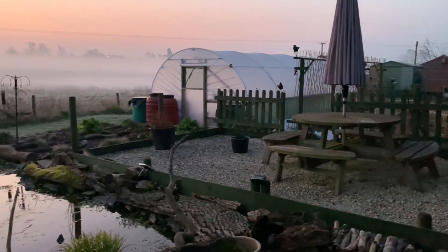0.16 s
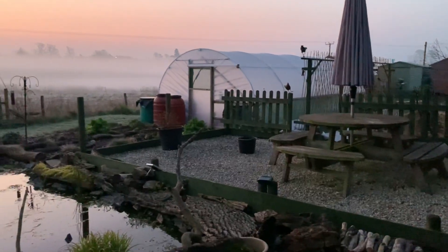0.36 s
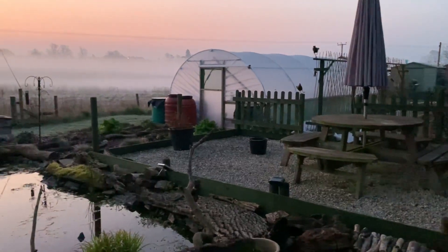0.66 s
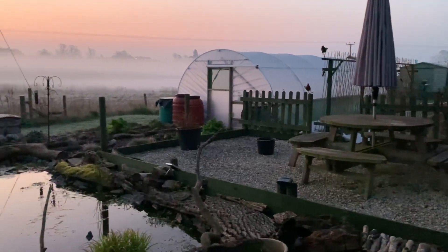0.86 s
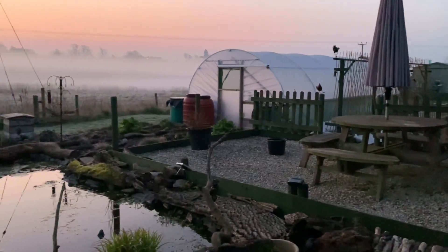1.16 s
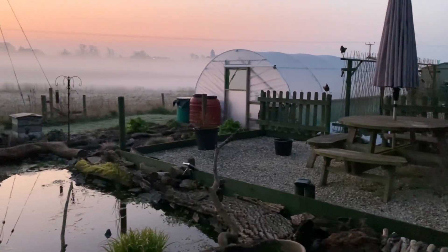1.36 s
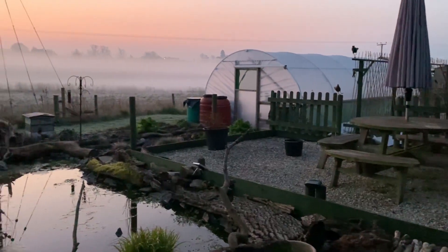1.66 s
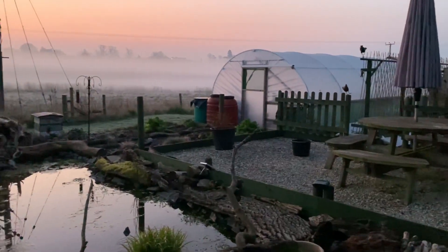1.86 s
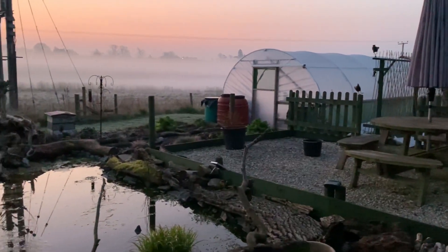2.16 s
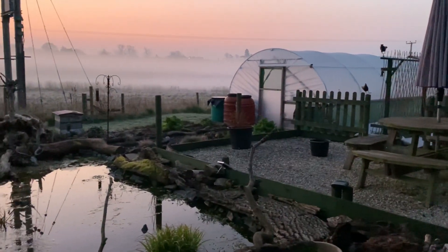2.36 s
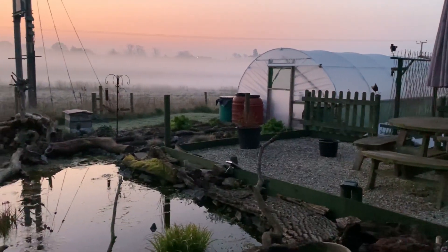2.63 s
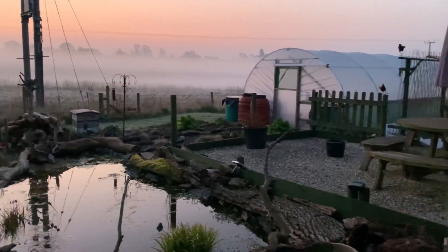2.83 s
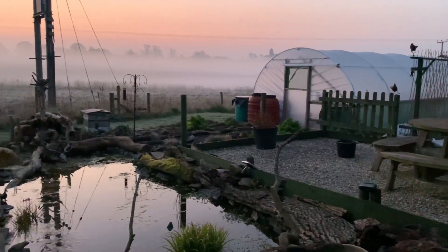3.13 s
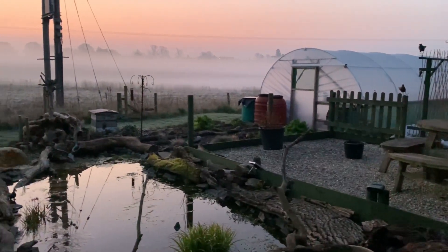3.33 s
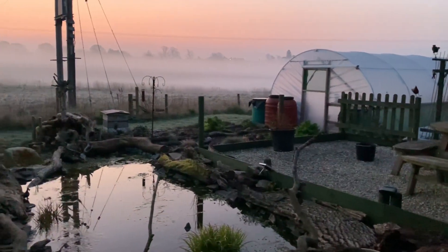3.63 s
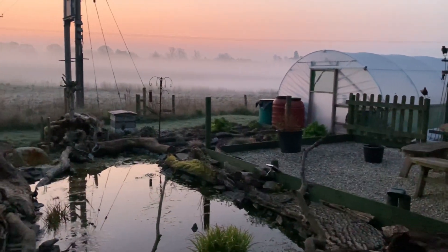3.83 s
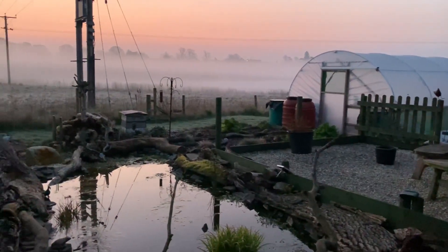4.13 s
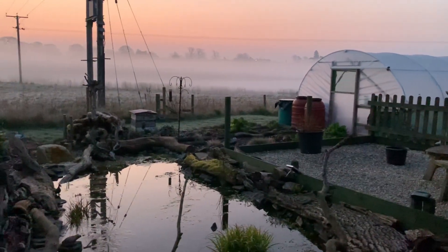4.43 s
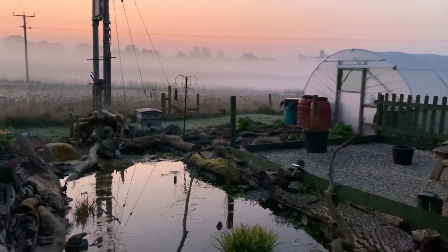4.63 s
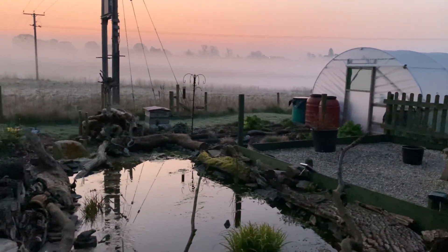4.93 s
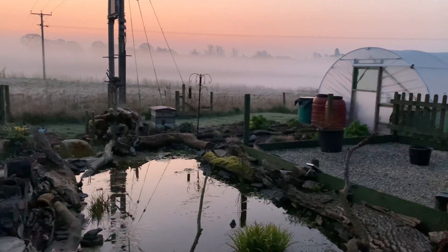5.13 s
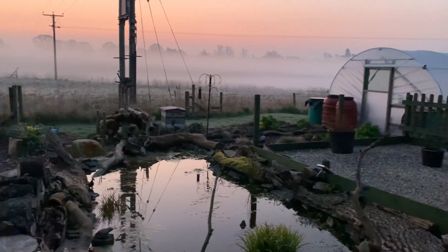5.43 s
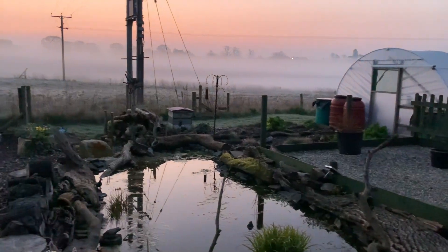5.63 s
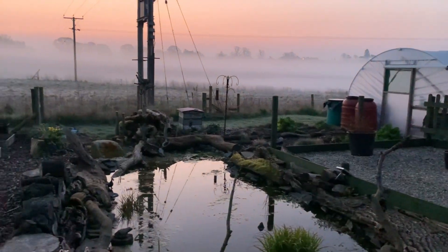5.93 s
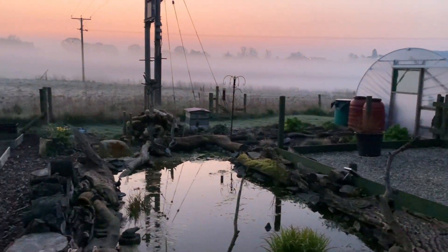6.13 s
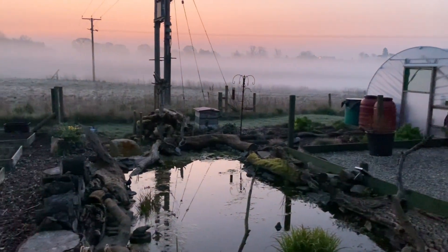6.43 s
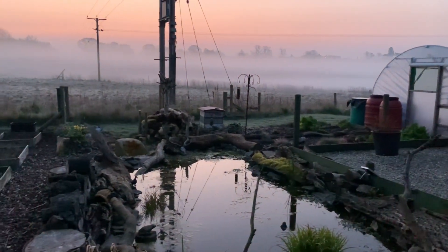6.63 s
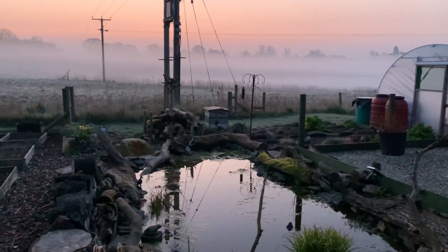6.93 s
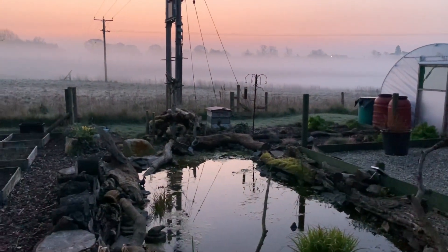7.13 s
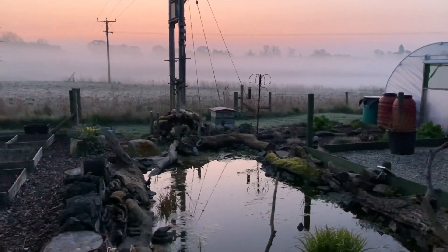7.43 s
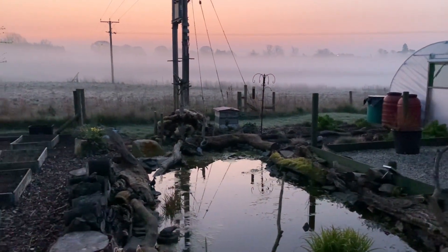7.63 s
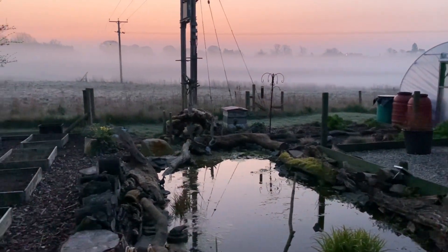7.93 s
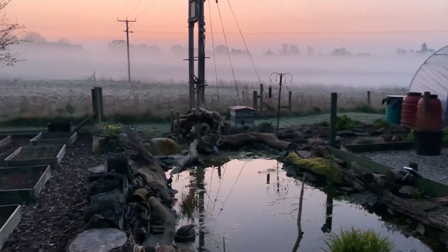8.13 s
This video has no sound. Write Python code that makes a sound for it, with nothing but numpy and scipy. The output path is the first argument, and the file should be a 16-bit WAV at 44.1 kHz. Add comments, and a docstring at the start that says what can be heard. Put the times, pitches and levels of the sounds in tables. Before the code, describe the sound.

Dawn birdsong outdoors: faint chirps and a pheasant's crow, then a rapid near warble, an answering trill, soft cockerels and clucks above low road rumble.

```python
"""A close songbird warbles in a country garden at dawn, heard by a hand-held two-port microphone. A second one answers
with whistles and a falling trill; fainter birds sing behind: all are gliding, nearly pure tones with weak overtones.
A pheasant, guinea fowl and a cockerel call from the left, a lower cockerel from the right: stacks of overtones shaped
by a throat, with hoarse breath for the pheasant. Sheds and hedges echo the birds. Filtered noise makes a far road
rumble and a blur of distant birds, and short resonances make the ticks of the hand on the housing."""
import sys
import numpy as np
from scipy import signal
from scipy.fft import rfft, irfft, next_fast_len
from scipy.io import wavfile
from scipy.ndimage import uniform_filter1d

SR = 44100
rng = np.random.default_rng(int(sys.argv[2]) if len(sys.argv) > 2 else 0)


def int16_out(signal):
    """Quantize to a 16-bit WAV file."""
    q = np.round(np.clip(np.atleast_2d(signal).T, -1, 1) * 32767)
    wavfile.write(sys.argv[1], SR, q.astype(np.int16))


N = 365588

# The colour of the road rumble. Each row: pitch in Hz, relative level in dB per Hz.
RUMBLE_COLOUR = [(15, -52.5), (25, -9.5), (71, 0.5), (140, -13.5), (227, -12.5), (331, -11), (1270, -30.5),
                 (2360, -41.5), (3170, -60), (4260, -47.5), (6730, -52), (10100, -50.5), (11800, -65.5),
                 (13500, -42.5), (15500, -77)]
# How alike the rumble is at the two ports. Each row: pitch in Hz, likeness from 0 to 1.
PORT_LIKENESS = [(60, .94), (130, .9), (290, .75), (640, .5), (1400, .1), (15000, 0)]
# The rise and fall of the many distant birds. Each row: time in seconds, relative level in dB.
CHORUS_LEVEL = [(0.0, -72.5), (1.48, -80), (2.119, -70), (2.28, -60), (3.02, -81), (3.55, -79),
                (4.5, -65.5), (6.189, -77.5), (6.53, -68), (7.3, -80.5), (7.57, -81.5), (8.29, -82)]
# The colour of their blur. Each row: pitch in Hz, relative level in dB per Hz.
CHORUS_COLOUR = [(1200, -5), (1800, -16), (2500, 12), (3500, 1), (5000, -4.5), (7000, -17), (9000, -33.5)]

# Strokes, the single sweeps of a voice, of the birds behind. Each row: start in seconds, length in seconds, first pitch
# in Hz, turning pitch in Hz, last pitch in Hz, turn as a share of the length, loudest point as a share of the length,
# peak level in dB, lag of the left port in milliseconds.
FAR_BIRD_STROKES = [(0, 0.19, 2293, 2540, 2570, 0.61, 0.043, -68.5, -.47),
                    (.03, .1, 4660, 4490, 4410, 0.51, .2, -77.5, 0),
                    (.4, .2, 3060, 2920, 2790, 0.42, .3, -83, 0),
                    (.2, 0.19, 1970, 2070, 1984, 0.35, 0.4, -76.5, .15),
                    (.31, 0.13, 3500, 3546, 3440, 0.28, 0.14, -73, -.028),
                    (.32, 0.34, 4010, 3720, 3700, 0.34, 0.32, -78.5, 0),
                    (.42, 0.14, 5830, 5770, 5370, 0.48, .6, -75, .4),
                    (.6, 0.23, 2290, 2320, 2450, 0.41, 0.17, -67.5, -.47),
                    (.87, 0.078, 1940, 1890, 1930, 0.52, .1, -72, .14),
                    (1.305, 0.012, 7440, 6960, 6270, 0.56, 0.089, -67, -.323),
                    (1.378, 0.14, 6100, 6770, 6400, .15, 0.9, -70.5, 0),
                    (1.558, 0.15, 6100, 6550, 6300, 0.15, 0.46, -68, 0),
                    (1.8, 0.044, 2470, 2530, 2430, 0.43, .9, -69, 0),
                    (1.86, 0.043, 5560, 5300, 4800, 0.67, 0.39, -66, 0),
                    (1.965, 0.028, 3730, 3040, 3000, 0.45, 0.24, -57.5, .23),
                    (1.967, 0.017, 4200, 4130, 4050, 0.52, .85, -53.5, .23),
                    (1.99, 0.018, 4200, 4050, 3980, 0.39, 1, -50.5, .23),
                    (2.032, 0.0068, 4260, 3960, 3840, .49, 1, -38, .23),
                    (2.058, 0.023, 3840, 3680, 3270, .55, .3, -37, .25),
                    (2.108, 0.017, 3920, 4010, 4040, 0.42, 0.65, -41, .23),
                    (2.11, .047, 6030, 7640, 6000, 0.29, .2, -59, -.48),
                    (2.125, 0.03, 2960, 2870, 2880, 0.37, .45, -51, 0),
                    (2.168, 0.022, 3420, 3570, 2500, 0.54, 0.42, -38.5, .23),
                    (2.22, 0.028, 3920, 3790, 3700, 0.55, .2, -46.5, .23),
                    (2.235, .02, 2960, 2790, 2770, .49, .55, -54, -.042),
                    (2.279, 0.028, 3440, 3340, 2400, 0.45, 0.33, -42, .23),
                    (2.32, .18, 2880, 2660, 3170, 0.27, 1, -60, 0),
                    (2.325, 0.028, 3696, 3680, 3580, 0.4, .1, -46.5, .23),
                    (2.38, 0.11, 3800, 3675, 3640, 0.43, 0.46, -49, .23),
                    (2.395, 0.017, 8700, 8000, 7760, 0.32, .9, -52.5, -.09),
                    (1.01, .06, 3550, 3620, 3630, .49, .55, -75, 0.025),
                    (2.577, .008, 6000, 6550, 7150, 0.55, .55, -49, -0.115),
                    (2.575, 0.031, 5420, 5700, 5280, 0.51, .1, -58.5, 0),
                    (2.645, 0.047, 6100, 5630, 5390, .63, .95, -53.5, -.28),
                    (2.69, 0.08, 5330, 5100, 5200, 0.36, 0.7, -64.5, 0),
                    (2.915, 0.028, 6300, 5500, 4740, 0.56, .6, -58.5, .18),
                    (2.94, 0.095, 7040, 6890, 6940, 0.43, 0.42, -50.5, .16),
                    (2.96, 0.058, 7840, 7520, 7300, 0.24, 0.95, -45.5, .055),
                    (3.025, 0.045, 6110, 5660, 4560, 0.54, 0.98, -46, -.9),
                    (3.11, 0.1, 6950, 7020, 7220, 0.36, 0.51, -54, -.14),
                    (3.08, .13, 7860, 7640, 7600, .6, 0.96, -48, -0.064),
                    (3.155, 0.055, 5900, 4900, 3900, 0.24, .1, -57, -.92),
                    (3.27, 0.032, 5250, 4840, 4270, .49, .1, -51, -.09),
                    (3.25, 0.11, 7600, 7850, 7640, .45, .7, -50, -0.069),
                    (3.38, 0.089, 7750, 7900, 7530, 0.43, .45, -70, -.09),
                    (3.6, 0.019, 6650, 6400, 6260, .49, 0.28, -67, 0),
                    (3.76, 0.056, 7700, 7900, 7800, 0.49, .05, -73.5, -.09),
                    (3.86, 0.12, 7700, 7760, 7800, 0.32, .85, -62.5, .16),
                    (3.93, 0.051, 2920, 2550, 2500, 0.6, 0.24, -61, -.44),
                    (4.05, 0.15, 7680, 8170, 7690, 0.39, 0.39, -59, -.11),
                    (4.26, 0.078, 8240, 8060, 7950, 0.46, .3, -70.5, -.11),
                    (4.43, .14, 2165, 1855, 2070, 0.46, 0.11, -68, -.082),
                    (4.53, 0.051, 6470, 6100, 6000, 0.56, .85, -59, 0),
                    (4.59, 0.25, 1890, 2137, 2260, 0.38, 0.42, -61, .16),
                    (5.005, 0.18, 2050, 1770, 1620, 0.51, 0.3, -68, -.43),
                    (5.03, 0.16, 3110, 2920, 2760, .49, .1, -72.5, 0),
                    (5.05, 0.044, 6400, 5830, 7100, 0.33, 0.79, -60, -1.3),
                    (5.14, 0.056, 4290, 4140, 4036, .2, 0.4, -52, -.42),
                    (5.25, 0.035, 5800, 5460, 4580, 0.66, 1, -46.5, -.47),
                    (5.25, .2, 1890, 2175, 2300, 0.4, 0.25, -69.5, .05),
                    (5.35, 0.019, 4120, 4000, 3670, 0.44, 0.96, -57, -.42),
                    (5.45, 0.11, 2200, 2120, 1990, 0.56, 0.95, -74.5, 0),
                    (5.6, 0.14, 3180, 2970, 2730, 0.38, 0.98, -70.5, 0),
                    (5.7, 0.26, 2150, 2020, 1820, 0.48, 0.11, -78.5, -.56),
                    (6.05, 0.042, 3880, 3820, 3800, 0.69, 0.09, -71, 0),
                    (7.05, 0.35, 8170, 8150, 7900, 0.55, 0.24, -79, .14)]
# Weak overtones of all whistles. Each row: overtone pitch in Hz, dB against the whistle before the singer's own offset.
WHISTLE_OVERTONES = [(7000, -30), (8500, -25), (10500, -44.5), (11800, -49), (13500, -29.5), (15000, -47)]

# Ticks of the hand on the housing. Each row: time in seconds, then the relative strength in dB of the blow
# on the low, the middle and the high resonance.
TICKS = [(.3031, -54, -46.5, -57), (.326, -60, -62, -58), (4.0133, -27, -48, -36.5), (7.042, -37, -54, -51),
         (7.213, -34, -44, -50), (7.369, -34, -52, -61)]
# Resonances of the housing. Each row: pitch in Hz, width in Hz.
HOUSING_RESONANCES = [(420, 310), (3400, 710), (8500, 600)]

# Voices in the pheasant's crows, two at once in the first. Each row: the columns of the far birds without the lag.
CROW_STROKES = [(1.09, 0.18, 744, 752, 752, 0.25, 0.22, -55),
                (1.09, .2, 354, 342.6, 353, 0.48, 0.32, -55.5),
                (1.523, 0.11, 941, 944, 950, 0.25, 0.07, -52)]
# Its throat. Each row: pitch in Hz, relative level in dB.
CROW_THROAT = [(400, -34), (740, 6), (1050, 7.5), (1450, -15), (2000, -7), (2800, -29), (3300, 4),
               (3700, 6), (4500, -12), (5200, -22), (5600, -54)]
# Breath of the crows. Each row: start in seconds, length in seconds, loudest point as a share of the length, peak in dB.
CROW_BREATHS = [(1.09, 0.2, 0.37, -54), (1.521, 0.19, 0.073, -57)]
# The colour of that breath. Each row: pitch in Hz, relative level in dB per Hz.
BREATH_COLOUR = [(350, -46), (600, -24), (724, -1.5), (1070, 1), (1520, -18.5), (3760, -3.5), (4990, -12.5),
                 (5420, -22), (6030, -28), (10000, -30.5), (13000, -85), (22000, -120)]

# Guinea fowl squeals. Each row: the columns of the far birds without the lag.
SQUEAL_STROKES = [(1.825, .14, 902, 975, 993, 0.295, 0.91, -60),
                  (2.075, .425, 1176, 1253, 1155, 0.162, 0.21, -54.5)]
# The squealing throat. Each row: pitch in Hz, relative level in dB.
SQUEAL_THROAT = [(900, -5.5), (2400, -1.5), (3600, -11.5), (4900, 1.5), (6100, -5.5), (7400, -11),
                 (8500, -10.5), (10000, -12), (12000, -52)]

# Buzzing twitter. Each row: the columns of the far birds without the lag; the note leaps around these pitches.
TWITTER_STROKES = [(2.6, .12, 7220, 7280, 7220, .4, .55, -46),
                   (2.757, .108, 6800, 7400, 7300, .2, .55, -47)]

# The close singer. Each row: the columns of the far birds without the lag, peaks before its range is applied.
WARBLER_STROKES = [(2.797, 0.045, 5630, 6200, 4700, 0.3, 0.27, -56),
                   (2.799, 0.033, 4520, 4100, 2960, 0.37, 0.045, -38.5),
                   (2.937, 0.016, 4680, 4055, 3770, .66, .5, -38),
                   (2.952, 0.05, 3604, 4700, 4150, 0.35, 0.27, -33),
                   (3.058, 0.04, 4770, 5650, 6770, 0.36, 0.48, -36.5),
                   (3.097, 0.044, 6100, 5716, 5834, 0.42, 0.49, -28.5),
                   (3.199, 0.016, 6000, 5980, 6140, .45, .3, -31.5),
                   (3.213, .02, 4290, 5410, 5320, 0.41, 0.84, -29),
                   (3.231, 0.0077, 5540, 4830, 3640, .49, .3, -33),
                   (3.236, 0.017, 5540, 4570, 3750, 0.57, 0.18, -33.5),
                   (3.249, 0.018, 3470, 3525, 3320, .45, 0.076, -34.5),
                   (3.369, 0.0076, 4590, 5650, 6770, 0.67, 0.94, -32),
                   (3.379, 0.028, 5300, 4850, 4500, 0.45, .2, -47),
                   (3.38, 0.03, 5270, 5700, 5510, .7, 1, -28),
                   (3.398, 0.019, 3620, 4400, 5050, .49, 0.68, -41),
                   (3.41, 0.035, 5440, 5100, 3360, .57, 0.37, -31),
                   (3.417, 0.086, 3650, 3823, 3806, 0.29, 0.86, -26.5),
                   (3.46, .011, 3680, 4420, 4970, 0.43, 0.13, -34),
                   (3.474, 0.021, 5180, 4350, 4740, 0.66, .6, -33.5),
                   (3.554, 0.11, 2940, 3430, 3547, 0.11, 0.38, -32.5),
                   (3.564, 0.016, 4330, 5280, 4570, 0.35, 0.94, -48.5),
                   (3.674, 0.018, 6290, 5220, 3680, 0.87, .55, -30),
                   (3.69, 0.029, 3670, 6170, 3380, 0.36, 0.36, -29),
                   (3.71, 0.071, 3580, 3950, 3813, 0.22, 0.1, -29.5),
                   (3.758, 0.07, 4120, 5192, 5330, 0.27, .55, -30),
                   (3.8, 0.2, 3853, 3804, 4010, 0.39, 0.66, -43),
                   (3.822, 0.16, 4500, 4410, 4510, 0.39, 0.27, -49.5),
                   (3.885, 0.03, 3570, 3425, 3110, 0.52, 0.54, -37.5),
                   (3.894, 0.03, 3200, 4330, 3230, 0.36, 0.75, -38.5),
                   (4.032, 0.008, 4630, 5100, 5420, 0.86, 0.64, -28.5),
                   (4.042, 0.021, 5025, 4940, 3700, 0.45, 0.15, -30),
                   (4.105, 0.0075, 4720, 5230, 5270, 0.65, 0.92, -28),
                   (4.11, 0.023, 5010, 4830, 3540, 0.81, 0.19, -29),
                   (4.178, 0.018, 4600, 6930, 5560, 0.94, 0.054, -33.5),
                   (4.198, 0.036, 5500, 5470, 5900, 0.51, 0.82, -30.5),
                   (4.238, .02, 5450, 5130, 4620, 0.4, 0.6, -29.5),
                   (4.325, 0.025, 4890, 6600, 5800, 0.72, 0.58, -34.5),
                   (4.349, 0.04, 6000, 5776, 5625, 0.14, 0.83, -27.5),
                   (4.393, 0.022, 5940, 4956, 5760, 0.21, .3, -33),
                   (4.474, 0.019, 3550, 3410, 3140, 0.55, .4, -44.5),
                   (4.49, 0.094, 4700, 3880, 4130, 0.39, 0.084, -53),
                   (4.574, 0.052, 2350, 3770, 4440, 0.34, 0.96, -35),
                   (4.666, 0.017, 5620, 4900, 4390, 0.22, 0.71, -35),
                   (4.682, .067, 5130, 3970, 3260, 0.49, .1, -35),
                   (4.829, 0.025, 4000, 5650, 5230, 0.37, 0.26, -39),
                   (4.836, 0.11, 4930, 3806, 4330, 0.17, 0.39, -34),
                   (4.934, 0.043, 4230, 4790, 4325, 0.23, 0.3, -35)]
# How strongly it sounds across its range. Each row: pitch in Hz, relative level in dB.
WARBLER_RANGE = [(2500, -0.5), (4000, -3.5), (5800, -0.5), (6700, -1)]
# Where it sits. One row: lag of the left port in milliseconds, left minus right in dB per kHz of pitch,
# pitch in Hz at which the ports are level.
WARBLER_PLACE = (.19, 2.0, 4400)

# The answering singer. Each row: the columns of the far birds without the lag, peaks before its range is applied.
WHISTLER_STROKES = [(5.412, 0.07, 7610, 5730, 6250, 0.63, 0.1, -45),
                    (5.52, 0.043, 4020, 4420, 5100, 0.22, 0.8, -44.5),
                    (5.57, 0.032, 7180, 6610, 5730, 0.6, 0.85, -44.5),
                    (5.62, 0.014, 6020, 6180, 6500, 0.38, 0.91, -46),
                    (5.69, 0.088, 4260, 3960, 3736, 0.19, 0.4, -43),
                    (5.826, 0.07, 5810, 5544, 4870, 0.48, 0.4, -36.5),
                    (5.89, 0.015, 5030, 4850, 4630, 0.53, .2, -37.5),
                    (6.047, 0.047, 5820, 7520, 6470, 0.38, 0.32, -34),
                    (6.138, 0.11, 4005, 3802, 3715, 0.3, .6, -39),
                    (6.325, .022, 7950, 7750, 7470, .45, .6, -36.5),
                    (6.347, 0.17, 7660, 7854, 7590, .25, 0.36, -36),
                    (6.595, .125, 5880, 5438, 5403, .38, 0.73, -34.5),
                    (7.525, .115, 7440, 6940, 6560, 0.3, 0.25, -36.5),
                    (7.645, 0.033, 5760, 4940, 3610, 0.57, 0.99, -37.5),
                    (7.718, 0.012, 5200, 6200, 8750, .3, 0.26, -42),
                    (7.737, .04, 8620, 7920, 6800, .49, 0.86, -42)]
# How strongly it sounds across its range. Each row: pitch in Hz, relative level in dB.
WHISTLER_RANGE = [(2900, -9), (3700, -1), (5800, -2), (7500, -10), (8700, -11.5)]
# Where it sits. One row: the columns of the close singer's place.
WHISTLER_PLACE = (-.47, -1.1, 4800)
# One stroke of its rattle. One row: length in seconds, first, turning and last pitch in Hz,
# turn and loudest point as shares of the length.
RATTLE_SWEEP = (.007, 6450, 4900, 3600, 0.86, 1.2)
# One sweep of its trill. Each row: time after the sweep starts in seconds, pitch in Hz, dB against the trill's level.
TRILL_SWEEP = [(0, 5886, -8), (.009, 5305, 3), (0.019, 4460, -5.5), (.032, 3850, 1), (.05, 3020, -10.5)]
# Its closing figure. Each row: stroke columns as above, start counted from the figure's start, dB against its level.
FIGURE_STROKES = [(0, 0.0409, 2930, 3670, 4180, 0.57, 0.76, -0.5),
                  (.046, .018, 4660, 5650, 8600, 0.38, 0.44, 0),
                  (.064, .076, 8600, 7650, 6950, .47, .55, -0.5)]
# When the figure comes. Each row: start in seconds, level in dB before the singer's range is applied.
FIGURE_STARTS = [(7.81, -38.5), (7.98, -39), (8.149, -38)]

# The low cockerel. Each row: the columns of the far birds without the lag.
LOW_COCK_STROKES = [(6.2, 0.077, 780, 828, 828, 0.37, 0.63, -65),
                    (6.29, 0.076, 815, 810, 787, .4, .45, -64), (6.41, 0.055, 828, 822, 803, 0.36, .3, -59),
                    (6.52, .06, 784, 798, 777, .4, .45, -64),
                    (6.62, 0.224, 778, 813, 846, 0.42, 0.15, -64.5),
                    (7.23, 0.68, 807, 791, 776, 0.66, 0.15, -63)]
# Its throat. Each row: pitch in Hz, relative level in dB.
LOW_COCK_THROAT = [(800, 8), (1600, 4.5), (2400, 10), (2900, -19.5), (3500, -44)]
# The high cockerel. Each row: the columns of the far birds without the lag.
HIGH_COCK_STROKES = [(6.435, 0.19, 998, 982, 873, 0.39, 0.56, -56.5),
                     (6.665, 0.353, 979, 955, 934, 0.39, 0.062, -60.5),
                     (7.0, 0.358, 917, 899, 882, 0.31, 0.2, -59.5)]
# Its throat. Each row: pitch in Hz, relative level in dB.
HIGH_COCK_THROAT = [(800, 3), (1000, 12.5), (1600, 9), (1950, 12.5), (2400, 7.5), (2900, -15.5),
                    (3500, -41.5)]

# Single chirrups. Each row: the columns of the far birds without the lag; a start past the end stays unheard.
CHIRRUP_STROKES = [(7.619, 0.041, 1090, 950, 880, 0.69, 0.12, -51.5),
                   (8.015, 0.023, 1000, 950, 962, 0.53, 0.57, -45.5),
                   (12, 0.017, 1500, 1100, 1010, 0.43, 0.64, -52),
                   (7.78, 0.039, 1000, 1023, 1010, .4, 0.45, -54),
                   (8.235, 0.065, 810, 820, 920, 0.64, 0.88, -58)]
# A double cluck. Each row: stroke columns, start counted from the cluck's start, dB against the cluck's level.
CLUCK_STROKES = [(0, .063, 1272, 812, 960, .53, 0.66, 0.15), (.065, 0.04, 761, 713, 1010, 0.61, 0.15, -1.5)]
# When the double cluck comes. Each row: start in seconds, level in dB.
CLUCK_STARTS = [(7.825, -43.5), (8.1, -42.5)]
# The clucking throat. Each row: pitch in Hz, relative level in dB.
CLUCK_THROAT = [(700, -1), (1000, 11.5), (1200, 13.5), (1450, -16.5), (1700, 3), (2100, -17), (2550, -2.5),
                (2900, -26), (3500, -52)]

RUMBLE_START_DB, RUMBLE_FADE_DB_PER_S, RUMBLE_WANDER_DB = -54.57, .4, .7
HOLD = 2.35  # the larger, the longer a stroke stays near its peak
TOP_HZ = 15700  # the recorder's upper limit; overtones above it are left out
FIELD_LATE_MS = -0.4596  # lag of the left port; below zero the sound reaches the left port first
TWITTER_SWINGS_PER_S, TWITTER_LEAP_HZ = 47.5, 290  # the leap goes about this far up and down
RATTLE_START_S, RATTLE_GAP_S = 5.93, .028
RATTLE_DB, RATTLE_FADE_DB = -45.5, 1.5  # first stroke before the singer's range, and loss from stroke to stroke
TRILL_START_S, TRILL_GAP_S, TRILL_DB = 6.772, .1302, -40
COCK_JITTER, COCK_ROUGH_DB = .004, 4  # blur as a share of the pitch, unevenness of each overtone


def undb(db):
    """Turns dB into a plain gain."""
    return 10 ** (np.asarray(db) / 20)


def unit(x):
    """Scales a sound to an rms (average strength) of 1."""
    return x / np.sqrt(np.mean(x ** 2))


def colour(points, hz):
    """Reads the gain at any pitch from rows of Hz and dB."""
    f, db = np.transpose(points)
    return undb(np.interp(np.log(np.maximum(hz, 1)), np.log(f), db))


def shaped(points):
    """Noise filtered to the given colour, rms 1."""
    spectrum = rfft(rng.standard_normal(N))
    return unit(irfft(spectrum * colour(points, np.fft.rfftfreq(N, 1 / SR)), N))


def walk(n, rate):
    """Smooth random wander, about rate turns a second, spread near 1."""
    k = max(int(SR / rate), 2)
    smooth = uniform_filter1d(uniform_filter1d(rng.standard_normal(n), k), k)
    return np.sqrt(1.2 * k) * smooth


def phase(hz):
    """Adds up a pitch in Hz into the running angle of its wave."""
    return 2 * np.pi * np.cumsum(hz) / SR


def road_rumble():
    """Deep noise that slowly fades and wanders, alike at both ports in the bass."""
    mid, side = rfft(shaped(RUMBLE_COLOUR)), rfft(shaped(RUMBLE_COLOUR))
    alike = np.interp(np.fft.rfftfreq(N, 1 / SR), *np.transpose(PORT_LIKENESS))
    opposite = np.array([[1], [-1]])
    rumble = irfft(mid * np.sqrt(1 + alike) + side * np.sqrt(1 - alike) * opposite, N)
    fade_db = RUMBLE_FADE_DB_PER_S * np.arange(N) / SR
    return unit(rumble) * undb(RUMBLE_START_DB - fade_db + RUMBLE_WANDER_DB * walk(N, 0.69))


def chorus_blur():
    """The farthest birds melt into coloured noise with a wavering level."""
    noise = np.array([shaped(CHORUS_COLOUR) for _ in range(2)])
    level = np.interp(np.arange(N) / SR, *np.transpose(CHORUS_LEVEL))
    return noise * undb(level - 4 + 3.5 * walk(N, 21))


def stroke(row, rise_db, fall_db, reach=((1, 0), (2, 0))):
    """Pitch glides to a turning point and on; the level swells and sinks away, within the voice's reach."""
    start, length, first, turning, last, turn, top, peak_db = row[:8]
    turn, top = np.clip([turn, top], .02, .98)
    u = np.linspace(0, 1, num=33)  # share of the stroke gone by
    hz = np.interp(u, [0, turn, 1], [first, turning, last])
    hz = uniform_filter1d(hz, size=5, mode="nearest")  # rounds the turn
    rising = rise_db * np.abs(1 - u / top) ** HOLD
    falling = fall_db * np.abs((u - top) / (1 - top)) ** HOLD
    below_peak_db = np.where(u < top, rising, falling)
    return np.transpose([start + length * u, hz, peak_db - below_peak_db + 20 * np.log10(colour(reach, hz))])


def add(out, rows, voice, pan_db, late_ms, fade_s):
    """Mixes in one note: the voice, given pitch (or time if it has none), at each port's level and lag."""
    s, *columns, db = np.transpose(rows)
    first = max(int((s[0] - fade_s) * SR), 0)
    t = np.arange(first, min(int((s[-1] + fade_s) * SR), N)) / SR
    edge = np.clip(np.minimum(t - s[0], s[-1] - t) / (2 * fade_s) + .5, 0, 1)
    x = voice(np.interp(t, s, columns[0]) if columns else t)
    x = x * undb(np.interp(t, s, db)) * np.sin(np.pi / 2 * edge) ** 2
    # turning the phase of each frequency delays by fractions of a sample
    size = next_fast_len(len(t) + 64)
    shift = np.outer([late_ms, -late_ms], np.fft.rfftfreq(size, 1000 / SR)) / 2
    both = irfft(rfft(np.pad(x, (32, 0)), size) * np.exp(-2j * np.pi * shift), size)[:, 32:32 + len(t)]
    out[:, first:first + len(t)] += both * undb([[pan_db / 2], [-pan_db / 2]])


def songbird(notes, overtone_db, flutter_db, fade_s):
    """Near-pure whistles with weak, hoarse overtones; the level flutters as the sound crosses moving air."""
    def whistle(hz):
        turn = phase(uniform_filter1d(hz, size=90))
        overtones = 0
        for k in (2, 3):
            hoarse = np.sin(k * turn + 0.52 * walk(len(hz), 760))
            overtones = overtones + colour(WHISTLE_OVERTONES, k * hz) * (k * hz < TOP_HZ) * hoarse
        tone = np.sin(turn) + undb(overtone_db) * overtones
        return np.sqrt(2) * tone * undb(flutter_db * walk(len(hz), 330))
    out = np.zeros((2, N))
    for pan_db, late_ms, rows in notes:
        add(out, rows, whistle, pan_db, late_ms, fade_s)
    return out


def distant_songs(count=150):
    """Faint wavering whistles of many birds at all sides, most of them low; air dulls the high ones."""
    s, db = np.transpose(CHORUS_LEVEL)
    notes = []
    for when, pitch, slur, waver, length, loud, side in rng.random((count, 7)):
        start, span = when * (N / SR - .3), 0.0368 + .16 * length
        hz = 2050 * 3.9 ** (pitch ** 2.6)
        level = np.interp(start, s, db) - 11.5 + 9 * loud - 6 * pitch
        middle_hz, last_hz = hz * (1 + 0.15 * (waver - .5)), hz * (1 + 0.26 * (slur - .55))
        rows = [(start, hz, level - 13.5), (start + span / 2, middle_hz, level), (start + span, last_hz, level - 7.5)]
        notes.append((0, side - .5, rows))
    return songbird(notes, -46, 2.5, 0.012)


def far_birds():
    """Whistles from behind, each with its own lag; those turning above 4500 Hz lean to the right port."""
    notes = []
    for row in FAR_BIRD_STROKES:
        pan_db = -.9 * max(row[3] / 1000 - 4.5, 0)
        notes.append((pan_db, row[8], stroke(row, 9, 11)))
    return songbird(notes, -7.5, 3.04, 0.0055)


def ticks():
    """Each tick rings the three resonances of the housing briefly, each by its own amount."""
    s, *strength_db = np.transpose(TICKS)
    out = np.zeros(N)
    for (hz, width), db in zip(HOUSING_RESONANCES, strength_db):
        x = np.zeros(N)
        x[(s * SR).astype(int)] = undb(db + 24)
        for band in (width, 2 * width):
            x = signal.lfilter(*signal.iirpeak(hz, hz / band, SR), x)
        out += x
    return out


def fowl(calls, throat, jitter, rough_db, late_ms, rise_db, fall_db):
    """A stack of overtones through the throat; jitter blurs the pitch, roughness the level."""
    def stack(hz):
        turn = phase(hz * (1 + jitter * walk(len(hz), 220)))
        total = 0
        for k in range(1, 16):
            gain = colour(throat, k * hz) * (k * hz < TOP_HZ)
            total = total + gain * undb(rough_db * walk(len(hz), 80)) * np.sin(k * turn)
        return unit(total)
    out = np.zeros((2, N))
    for row in calls:
        add(out, stroke(row, rise_db, fall_db), stack, 0, late_ms, .008)
    return out


def pheasant():
    """A hoarse crow: unsteady voices over turbulent breath let through in uneven puffs."""
    puffs = 1 + 0.19 * np.sin(phase(280 + 25 * walk(N, 62.7)))
    breath = unit(puffs * shaped(BREATH_COLOUR) * undb(2.2 * walk(N, 60)))
    out = fowl(CROW_STROKES, CROW_THROAT, .005, 8.3, FIELD_LATE_MS, 3.9, 16)
    for start, length, top, peak_db in CROW_BREATHS:
        # breath has no pitch, so only time and level are kept
        rows = stroke((start, length, 1, 1, 1, top, top, peak_db), 8.1, 14.6)[:, ::2]
        add(out, rows, lambda t: breath[(t * SR + .5).astype(int)], -1, FIELD_LATE_MS, .008)
    return out


def squeals():
    """Guinea fowl squeal with gliding overtones and a blurred pitch."""
    return fowl(SQUEAL_STROKES, SQUEAL_THROAT, 0.0111, 4.9, FIELD_LATE_MS, 2.0, 19)


def twitter():
    """A whistle leaps between a low and a high note in quick pulses; a faster vibration adds sidebands."""
    def buzz(hz):
        n = len(hz)
        vibration = np.sin(phase(520 + 60 * walk(n, 55)))
        swing = np.sin(phase(TWITTER_SWINGS_PER_S + 1.5 * walk(n, 30)))
        leaping_hz = hz - TWITTER_LEAP_HZ * np.tanh(3 * swing) + 60 * walk(n, 70)
        turn = phase(leaping_hz) + 0.55 * vibration
        tone = np.sin(turn) + undb(-29.5) * np.sin(2 * turn)
        return unit(np.abs(swing) * tone * undb(3.1 * walk(n, 200)))
    out = np.zeros((2, N))
    for row in TWITTER_STROKES:
        add(out, stroke(row, 2.3, 3.8), buzz, -4, -.1, .006)
    return out


def placed(curves, place):
    """The housing shades one port more as the pitch goes up."""
    late_ms, db_per_khz, level_hz = place
    notes = []
    for curve in curves:
        mean_hz = np.mean(np.array(curve)[:, 1])
        notes.append((db_per_khz * (mean_hz - level_hz) / 1000, late_ms, curve))
    return notes


def warbler():
    """The close singer: quick gliding whistles, clearest in overtones."""
    curves = [stroke(row, 8.1, 9, WARBLER_RANGE) for row in WARBLER_STROKES]
    return songbird(placed(curves, WARBLER_PLACE), 3.85, 1.6, 0.0023)


def repeated(figure, repeats):
    """The strokes of a figure at each of its starts and levels."""
    return [(start + s, *shape, peak_db + db) for start, peak_db in repeats for s, *shape, db in figure]


def rattle(count=4):
    """One quick stroke again and again, each weaker than the last."""
    return [(RATTLE_START_S + k * RATTLE_GAP_S, *RATTLE_SWEEP, RATTLE_DB - k * RATTLE_FADE_DB) for k in range(count)]


def trill(count=6):
    """The same falling sweep, again and again."""
    starts = [TRILL_START_S + k * TRILL_GAP_S for k in range(count)]
    return [[(start + s, hz, TRILL_DB + db) for s, hz, db in TRILL_SWEEP] for start in starts]


def whistler():
    """The answering singer: whistles, a rattle, a trill and a repeated closing figure."""
    strokes = WHISTLER_STROKES + rattle() + repeated(FIGURE_STROKES, FIGURE_STARTS)
    curves = [stroke(row, 8.7, 6.3, WHISTLER_RANGE) for row in strokes] + trill()
    return songbird(placed(curves, WHISTLER_PLACE), -10.5, 0.53, 0.0013)


def cockerels():
    """Two crowing stacks of overtones: a low one from the right, then a higher one from the left."""
    low = fowl(LOW_COCK_STROKES, LOW_COCK_THROAT, COCK_JITTER, COCK_ROUGH_DB, 0.35, 1.7, 3.8)
    high = fowl(HIGH_COCK_STROKES, HIGH_COCK_THROAT, COCK_JITTER, COCK_ROUGH_DB, FIELD_LATE_MS, 2.4, 6.7)
    return low + high


def clucks():
    """Chirrups and double clucks: short gliding overtones through one throat."""
    calls = repeated(CLUCK_STROKES, CLUCK_STARTS) + CHIRRUP_STROKES
    return fowl(calls, CLUCK_THROAT, 0.0047, 1.8, FIELD_LATE_MS, 12, 15)


def echo(dry, early_db, early_t60, late_db, late_t60):
    """Dense returns from twigs and ground, then a tail from sheds and hedges, different at each port."""
    # t60 is the time in seconds for a fall of 60 dB
    t = np.arange(SR) / SR
    early = rng.standard_normal(SR) * undb(-60 * t / early_t60) * np.clip(t / 0.0017, 0, 1)
    uneven_db = 3.05 * walk(SR, 42)
    late = rng.standard_normal((2, SR)) * undb(-60 * t / late_t60 + uneven_db) * np.clip(t / 0.009, 0, 1)
    tail = (undb(early_db) * unit(early) + undb(late_db) * unit(late)) / np.sqrt(SR)
    return dry + signal.fftconvolve(dry, tail, axes=1)[:, :N]


def scene():
    """Adds all sources, the birds in groups that each have their own echo."""
    background = road_rumble() + chorus_blur() + echo(distant_songs(), 6.1, .25, 2.6, 0.67)
    behind = echo(far_birds() + twitter(), -8.5, 0.057, -5.0, 0.45)
    field = echo(pheasant() + squeals() + cockerels(), -1.5, .14, -0.5, 0.64)
    near = echo(warbler(), -4, 0.096, -11, 0.42)
    second = echo(whistler(), -0.43, 0.13, -4.0, 0.44)
    yard = echo(clucks(), -2.5, 0.08, -4.5, 0.79)
    return background + behind + ticks() + field + near + second + yard


def record(dry):
    """The microphone loses the deepest bass; the recorder cuts the top steeply."""
    thinned = signal.sosfilt(signal.butter(3, 34, "highpass", fs=SR, output="sos"), dry)
    return signal.sosfilt(signal.ellip(10, .2, 70, TOP_HZ, fs=SR, output="sos"), thinned)


dry = scene()
out = record(dry)
int16_out(out)
```